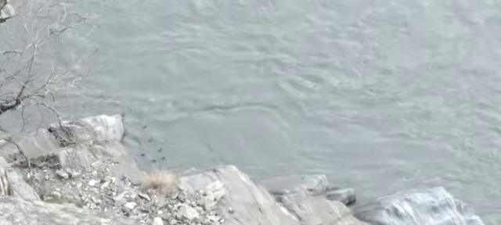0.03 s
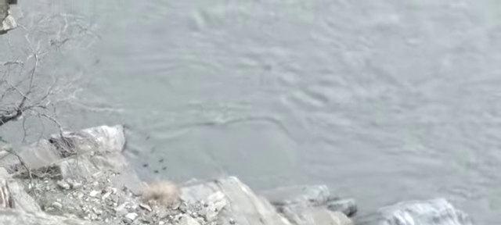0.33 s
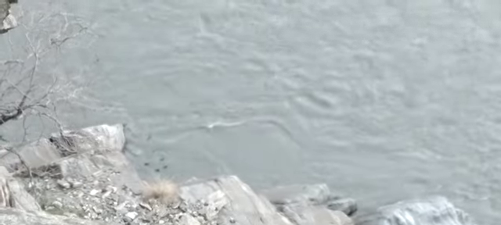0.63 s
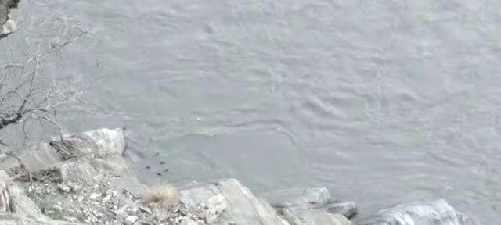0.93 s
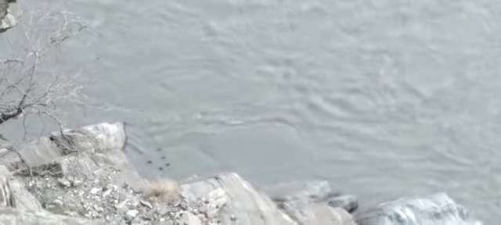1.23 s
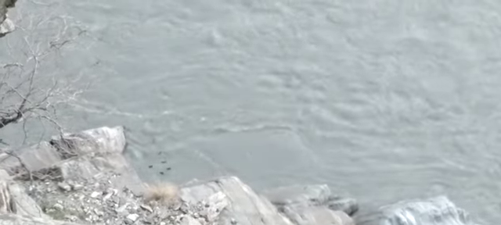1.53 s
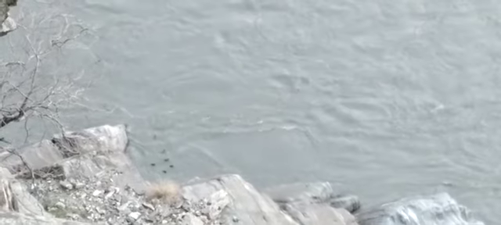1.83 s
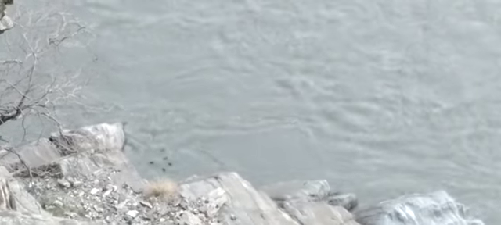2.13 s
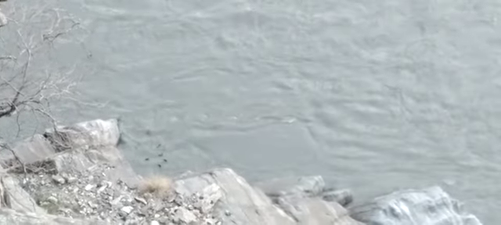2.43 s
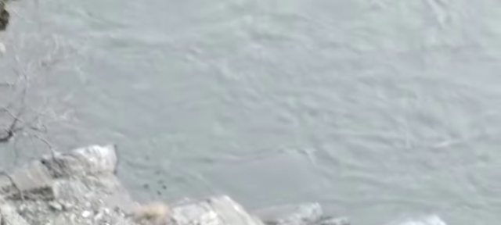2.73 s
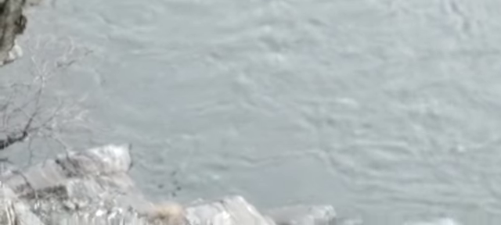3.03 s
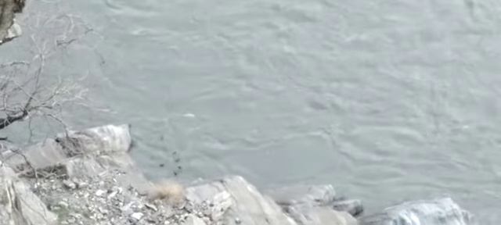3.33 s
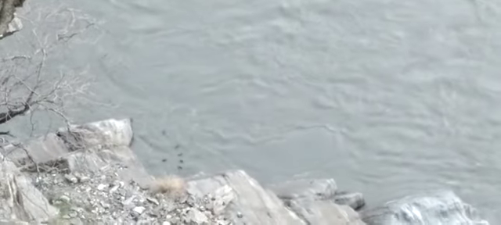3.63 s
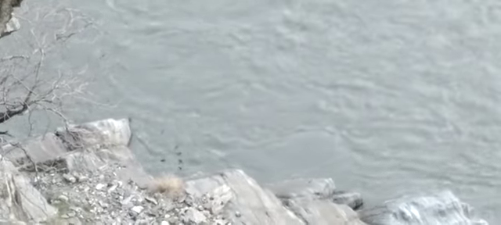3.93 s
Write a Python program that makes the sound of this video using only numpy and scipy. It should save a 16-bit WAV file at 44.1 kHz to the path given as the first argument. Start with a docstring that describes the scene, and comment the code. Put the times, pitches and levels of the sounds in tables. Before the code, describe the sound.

The deep, even rush of a river is heard from its rocky bank, starting after a brief silence. A breeze buffets the microphone lightly now and then, while faint droplets and small handling ticks sit under the water.

```python
"""A wide river from its rocky bank

After a moment of silence, the deep, steady rush of the current fades in with a soft thump.
Countless small bubbles ring in the water, and a few droplets splash at the rocks.
A light breeze rumbles on the two microphone openings, and the hand holding the recorder
makes a few faint ticks and brushes against its case."""
import sys
import numpy as np
from scipy import signal
from scipy.fft import rfft, irfft
from scipy.io import wavfile

SR = 44100
rng = np.random.default_rng(int(sys.argv[2]) if len(sys.argv) > 2 else 0)


def generate_wav(sig):
    """Save sig (samples, or channels by samples) to the path in sys.argv[1] as 16-bit PCM at SR."""
    pcm = np.round(np.clip(np.atleast_2d(sig).T, -1, 1) * 32767).astype(np.int16)
    wavfile.write(sys.argv[1], SR, pcm)


N = 176400
T = np.arange(N) / SR
HZ = np.maximum(np.arange(N // 2 + 1) * SR / N, 1)


def river(level_db=-38.5, bubble_mix_db=-8.5, slosh_db=-0.11, sloshes_per_s=25):
    """Current and bubbles swell together and reach the right side just before the left."""
    # tone of the rushing water: f/Hz, relative level/dB
    rush_tone = [(30, -3.5), (60, 0), (95, .5), (125, 1.5), (155, -1), (190, 2), (240, -5), (280, -4),
                 (322, -1), (410, -2.5), (470, -4), (515, -8), (650, -9), (740, -12), (1050, -13),
                 (1300, -14.5), (1570, -14.5), (1850, -20), (2600, -22), (3050, -19.5), (3500, -21),
                 (4100, -29.4), (5000, -39), (5600, -38), (6400, -35.5), (7500, -52), (9000, -55.5),
                 (11000, -63), (15500, -64.5)]
    # how the two sides compare: f/Hz, likeness (0 to 1), head start of the left/radians
    sides = [(60, .85, -.1), (170, .97, -.15), (245, .88, -.2), (400, .93, -.3), (620, .64, -.6),
             (770, .32, -.9), (900, .52, -.6), (1300, .55, -1.7), (1420, .55, -1.3), (1600, .62, -1.7),
             (1780, .38, -2.2), (1900, .22, -1.4), (2200, .42, -.1), (3300, .45, -2.7), (4000, .3, -3.6),
             (5000, .13, -5.6), (10000, .1, -6.3)]
    # how much louder the water is on the left: f/Hz, left minus right/dB
    balance = [(150, 2.2), (450, 2.5), (800, 2.1), (2300, 1.4), (3300, 10), (5000, 5.5), (6300, 19),
               (8400, -3.5), (11000, 0.5)]
    # strength of the flow: t/s, level change/dB
    flow = [(.7, .5), (1.1, 0.6), (1.7, -0.77), (2.3, 0.15), (2.7, 0.13), (3.15, -0.1), (3.7, .4),
            (4.0, 0.6)]
    left, unrelated = (rfft(current() + from_db(bubble_mix_db) * bubbles()) for _ in range(2))
    alike, left_lead = at_hz(sides)
    right = (alike * left + np.sqrt(1 - alike ** 2) * unrelated) * np.exp(-1j * left_lead)
    water = irfft(np.array([left, right]) * pan(at_hz(balance)[0]), N)
    slosh = slosh_db * drift(sloshes_per_s)
    return coloured(water, rush_tone) * from_db(level_db + in_time(flow) + slosh)


def current(bands=14, churn_db=1.01, churns_per_s=11):
    """Swirling water: noise split into bands from low to high, each swelling by itself."""
    noise = rfft(rng.standard_normal(N))
    band_number = np.interp(np.log(HZ), np.log([100, 9000]), [0, bands - 1])
    rush = np.zeros(N)
    for k in range(bands):
        band = irfft(noise * np.maximum(1 - abs(band_number - k), 0), N)
        rush += band * from_db(churn_db * drift(churns_per_s))
    return rms_one(rush)


def bubbles(per_s=1500, low_hz=300, high_hz=7000, spread_db=4, ring_cycles=12.6, rise=0.077):
    """Bubbles of all sizes ring briefly, rising in pitch as they reach the surface."""
    fizz = np.zeros(N + SR)
    for when, pitch, strength, sign in rng.random((int(per_s * N / SR), 4)):
        hz = (np.sqrt(low_hz) + pitch * (np.sqrt(high_hz) - np.sqrt(low_hz))) ** 2
        life = ring_cycles / hz
        t = np.arange(int(life * SR)) / SR
        boost_db = spread_db * min(-np.log(1 - strength), 4.5)  # most are weak, a few stand out
        gain = from_db(boost_db) * hz ** .75 * np.sign(sign - .5)
        tone = np.sin(2 * np.pi * hz * t * (1 + rise * t / life))
        start = int(when * N)
        fizz[start:start + len(t)] += gain * np.exp(-np.log(1000) * t / life) * tone
    return rms_one(fizz[:N]) * np.sqrt(2 * high_hz / SR)


def breeze():
    """Gusts of air rumble on each microphone opening separately."""
    # strength of the gusts: t/s, left level/dB, right level/dB
    gusts = [(.5, -54, -35), (.62, -46, -44), (.79, -42, -50), (.87, -38, -35), (.95, -36, -46),
             (1.02, -36, -52), (1.16, -50, -39), (1.37, -38, -51), (1.55, -59, -56), (1.85, -49, -47),
             (2.06, -48, -54), (2.12, -25.5, -36), (2.2, -37, -39), (2.4, -41, -43), (2.54, -36, -38),
             (2.67, -49, -41.5), (2.77, -33, -48), (2.88, -46, -46), (3.12, -53, -58), (3.22, -56, -52),
             (3.31, -45, -39), (3.45, -50, -44), (3.57, -48, -46), (3.67, -46, -31.5), (3.85, -47, -43.5),
             (4.0, -40, -36)]
    # tone of the rumble: f/Hz, relative level/dB
    rumble_tone = [(3, -10.5), (12, 6), (28, -4.5), (50, 1), (80, -14.5), (140, -20), (300, -40),
                   (1000, -83.5)]
    times, *sides_db = np.transpose(gusts)
    rumble = coloured(rng.standard_normal((2, N)), rumble_tone)
    return rumble * from_db([np.interp(T, times, db) for db in sides_db])


def droplets(ring_s=0.016, left_louder_db=9):
    """Droplets hit the rocks in tiny, bright splashes."""
    # the splashes: t/s, level/dB
    drops = [(0.883, -58), (1.169, -61), (1.541, -58), (2.752, -57), (2.7676, -60), (2.969, -58)]
    # tone of a splash: f/Hz, relative level/dB
    splash_tone = [(2000, -14), (4500, -1), (6300, 10), (8000, -12), (11000, -30), (15500, -23)]
    spray = coloured(rng.standard_normal((2, N)), splash_tone) * pan(left_louder_db)
    return spray * sum(from_db(db) * burst(start, ring_s) for start, db in drops)


def handling(grain_db=3.0, grains_per_s=50):
    """The case ticks in the hand, and fingers brush it with a faint, grainy hiss."""
    # ticks of the case: t/s, level/dB, left minus right/dB, ring time/s
    ticks = [(1.8785, -56, 1, .012), (1.888, -58, -.5, .016), (1.902, -64, 0, .07),
             (2.8095, -48, 1, 0.0079)]
    # tone of a tick: f/Hz, relative level/dB
    tick_tone = [(1500, -12), (4000, -6), (6000, 7), (9000, -5), (12000, -12), (15500, -11)]
    # strength of the brushing: t/s, level/dB
    grip = [(2.18, -100), (2.25, -79), (2.42, -90), (2.62, -79), (2.8, -83), (2.97, -80.5), (3.15, -82),
            (3.3, -100)]
    # tone of the brushing: f/Hz, relative level/dB
    brush_tone = [(3000, -21.5), (6500, -2), (9000, -6), (10500, -14), (15500, -18)]
    crack = coloured(rng.standard_normal((2, N)), tick_tone)
    tick_gain = sum(pan(side) * from_db(db) * burst(start, ring) for start, db, side, ring in ticks)
    brush = coloured(rng.standard_normal((2, N)), brush_tone)
    brush_gain = from_db(in_time(grip) + grain_db * drift(grains_per_s))
    return crack * tick_gain + brush * brush_gain


def from_db(db):
    """Turn decibels into a number to multiply by."""
    return 10 ** (np.asarray(db) / 20)


def rms_one(x):
    """Scale a signal to an average power of 1."""
    return x / np.sqrt(np.mean(x ** 2) + 1e-20)


def in_time(rows):
    """Join the points of a time table with straight lines."""
    return np.interp(T, *np.transpose(rows))


def at_hz(rows):
    """Read each column of a frequency table at every frequency."""
    hz, *columns = np.transpose(rows)
    return [np.interp(np.log(HZ), np.log(hz), column) for column in columns]


def coloured(x, tone):
    """Shape a signal with a tone table, then scale its power to 1."""
    return rms_one(irfft(rfft(x) * from_db(at_hz(tone)[0]), N))


def pan(db):
    """Left and right gains, db apart, that keep the total power."""
    right = np.sqrt(2 / (1 + from_db(db) ** 2))
    return np.array([right * from_db(db), right]).reshape(2, -1)


def drift(rate_hz):
    """A smooth random wobble with a typical size of 1."""
    hz = np.arange(1001) * SR / N
    slow = rms_one(irfft(rfft(rng.standard_normal(2000)) / (1 + (hz / rate_hz) ** 2)))
    return np.interp(np.linspace(0, len(slow) - 1, N), np.arange(len(slow)), slow)


def burst(start_s, ring_s):
    """A sudden start that dies away by 60 dB in the ring time."""
    return (T >= start_s) * np.exp(-np.log(1000) * np.clip((T - start_s) / ring_s, 0, 10))


def scene():
    """River, breeze, droplets and hand, heard together."""
    return river() + breeze() + droplets() + handling()


def record(dry, start_s=0.38, fade_s=0.31, step_s=.01, first_gain=.06, cutoff_hz=15700):
    """The sound fades in by small steps with a soft thump; the highest treble is cut."""
    since = np.maximum(T - start_s, 0)
    fade = (T >= start_s) * np.minimum(first_gain + np.floor(since / step_s) * step_s / fade_s, 1)
    thump = 0.054 * np.exp(-since / .08)
    treble_cut = signal.ellip(10, .1, 70, cutoff_hz, fs=SR, output="sos")
    return signal.sosfilt(treble_cut, (dry + thump) * fade)


dry = scene()
out = record(dry)
generate_wav(out)
```